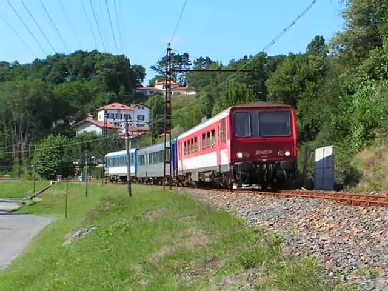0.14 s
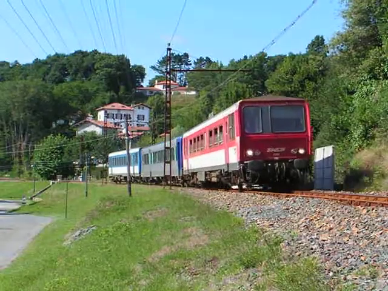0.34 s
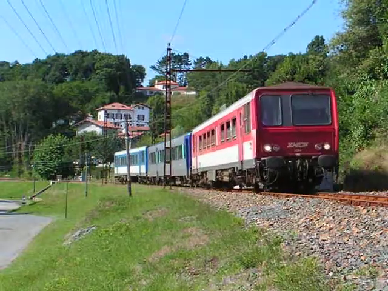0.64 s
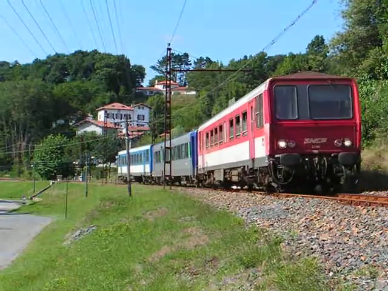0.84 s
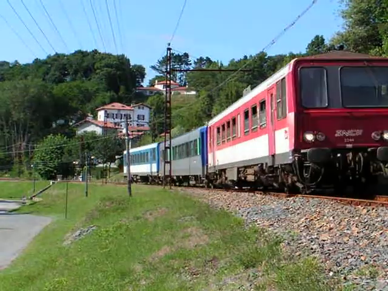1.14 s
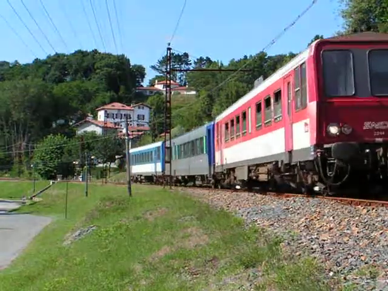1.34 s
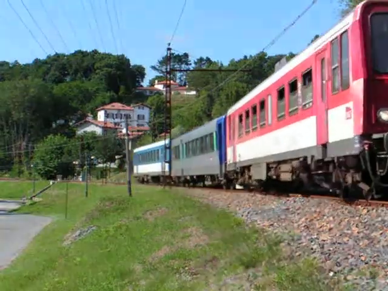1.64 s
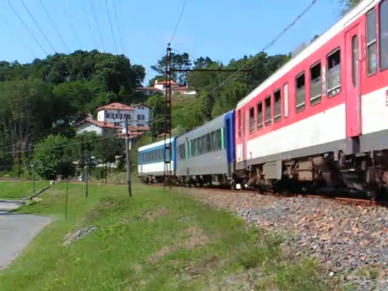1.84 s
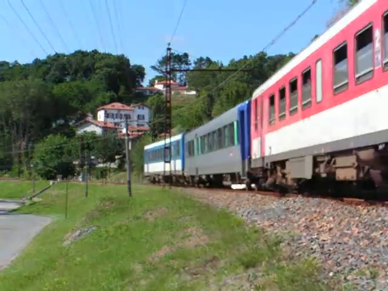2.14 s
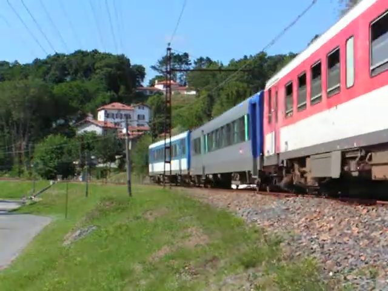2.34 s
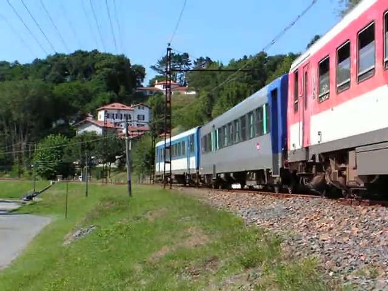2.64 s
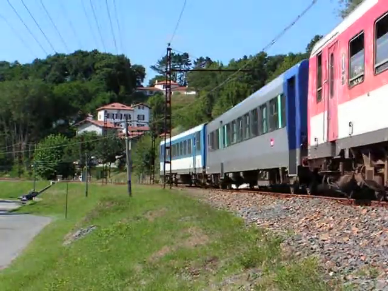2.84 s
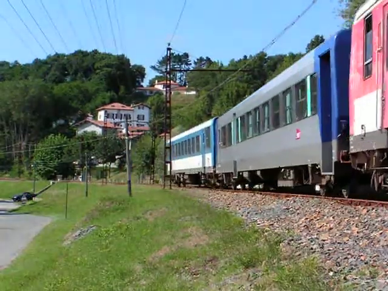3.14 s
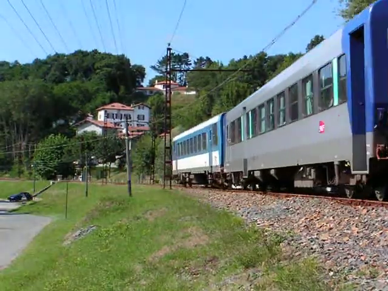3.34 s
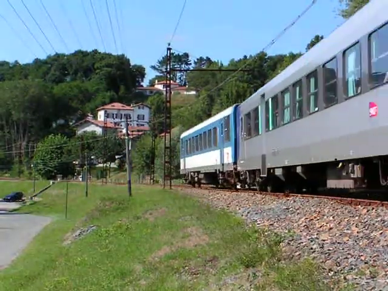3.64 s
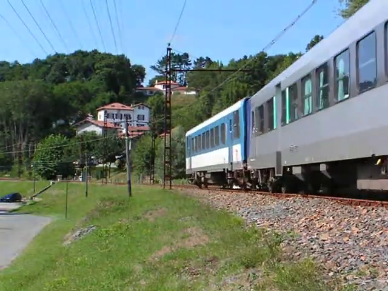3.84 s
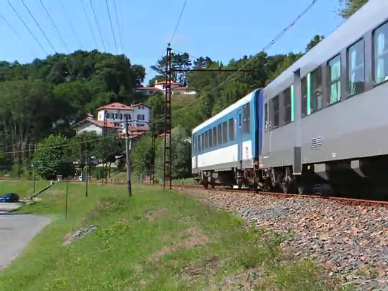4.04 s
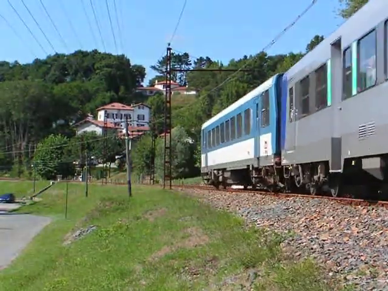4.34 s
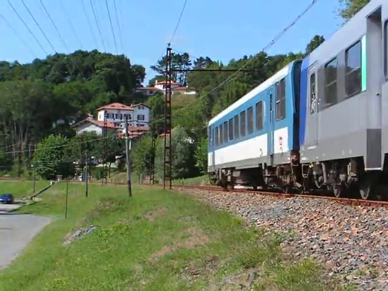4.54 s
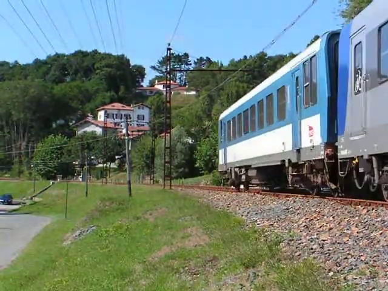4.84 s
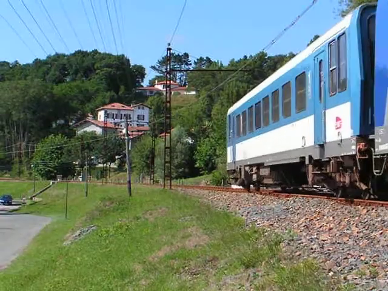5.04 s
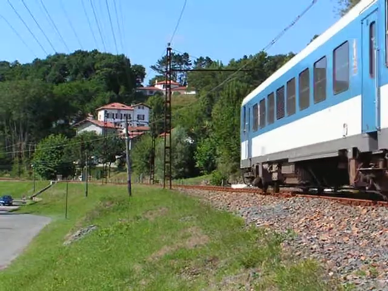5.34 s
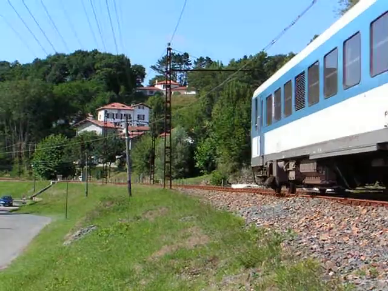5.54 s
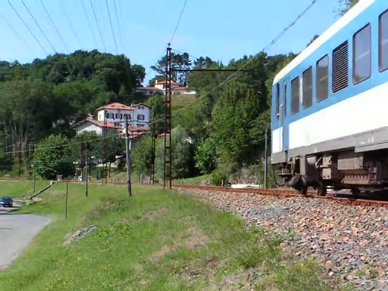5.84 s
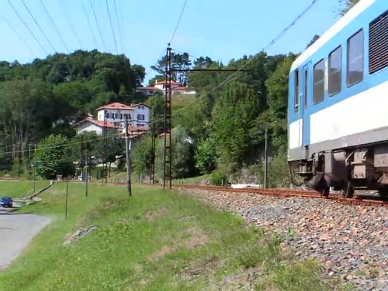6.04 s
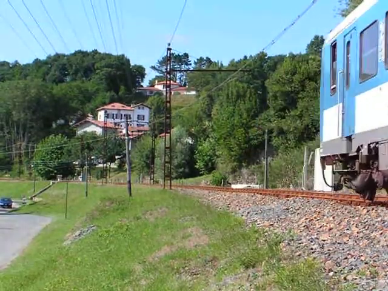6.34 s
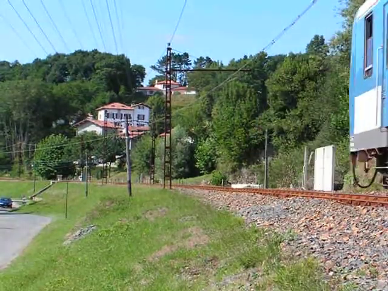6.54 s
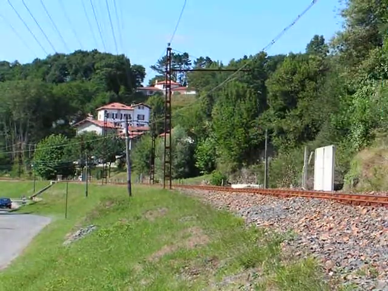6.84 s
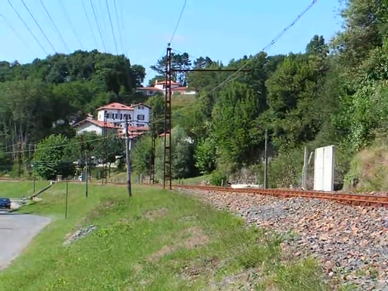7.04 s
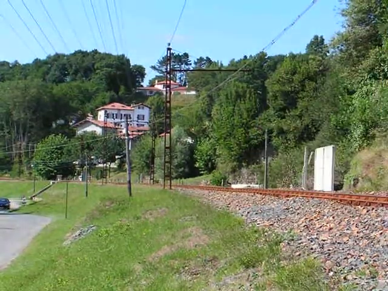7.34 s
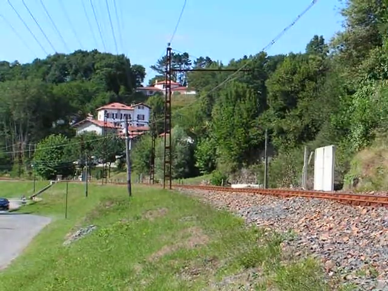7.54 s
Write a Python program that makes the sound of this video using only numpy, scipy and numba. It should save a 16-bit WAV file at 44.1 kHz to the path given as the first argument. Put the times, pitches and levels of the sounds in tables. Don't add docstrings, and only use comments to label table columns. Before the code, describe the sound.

A diesel railcar with coaches rolls past close by, engine throbbing low, wheels roaring and banging hard over rail joints with metallic ringing.

```python
import sys
import numpy as np
from scipy import signal
from scipy.fft import rfft, irfft
from scipy.io import wavfile
from scipy.ndimage import uniform_filter1d
from numba import njit

SR = 44100
rng = np.random.default_rng(int(sys.argv[2]) if len(sys.argv) > 2 else 0)


def amplitude_ratio(level_db):
    exponent = np.asarray(level_db, float) / 20
    return 10 ** exponent


def inscribe(sig):
    pcm = np.round(np.clip(np.atleast_2d(sig).T, -1, 1) * 32767)
    wavfile.write(sys.argv[1], SR, pcm.astype(np.int16))


N = 338688
T_S = np.arange(N) / SR

# centre in [Hz], width in [Hz], level in [dB].
WAKE_BANDS = [(50, 30, -4.5), (85, 44, 2.5)]
WAKE_CENTRE_S, WAKE_SPAN_S, WAKE_DB = 7.15, 0.2, -33

# centre in [Hz], width in [Hz], level in [dB].
SINGING_BANDS = [(1630, 28, 0.5)]
SINGING_CENTRE_S, SINGING_SPAN_S, SINGING_DB = 7.14, 0.36, -28.5

# centre in [Hz], width in [Hz], level in [dB].
EXHAUST_BANDS = [(124.7, 35, -4), (158.7, 32.4, 2), (192.2, 34, -3.5), (243, 69, -11), (85, 17, -7.5),
                 (50, 23, -8.5)]
FIRING_HZ, FIRING_SCATTER, FIRING_SIZE_DB, PUFF_DECAY_S = 27.5, 0.12, 4, 0.0074
ENGINE_GONE_S, ENGINE_FADE_S, ENGINE_LEFT = 2.85, 0.3, 0.59

# centre in [Hz], width in [Hz], level in [dB].
RUMBLE_BANDS = [(149, 88, -8), (214.7, 60, 3), (270.7, 60, 1)]

# time in [s], rolling level in [dB], engine and underframe level in [dB],
# floor resonance over rolling in [dB], rail corrugation over rolling in [dB].
TRAIN_LEVELS = [(0, -24, -27, -11.5, -9), (.2, -22.5, -27.5, -7.5, -8), (.53, -25.5, -27, -5.5, -5),
                (.88, -23.5, -27, -5, -6), (1.27, -20, -25.5, -9, -9.5), (1.7, -25, -27.5, -7, -8),
                (1.9, -22.5, -23.5, -8, -9), (2.251, -26, -25, -3, -7), (2.65, -25.5, -25, -4, -7.5),
                (2.84, -25.5, -25, 2, -4), (3.75, -29.5, -28, 0.5, 2.5), (4.45, -22.5, -30.5, 1.5, -3.5),
                (4.901, -23, -26, 3.5, -1), (5.13, -26, -23.5, 10.5, 1.5), (5.7, -25.5, -29.5, 1.5, -1.5),
                (6.27, -27.5, -37, 3.5, -1), (7.0, -27, -25.5, 7, 6.5), (7.37, -22, -27.5, 2.5, -1)]

# centre in [Hz], width in [Hz], level in [dB].
BODY_BANDS = [(310, 170, -2.5), (459, 158, 0.5), (668, 140, -6.5), (812, 230, 1.5)]

# time in [s], pitch in [Hz].
BOOM_PITCH = [(0, 474), (3.4, 495), (4.5, 645), (6.3, 575), (7.2, 506), (7.68, 563)]
BOOM_WIDTH_HZ, BOOM_DB, BOOM_WANDER = 147, -3, 0.066

# centre in [Hz], width in [Hz], level in [dB].
RAIL_BANDS = [(1000, 420, 1.5), (1260, 350, 0.5), (1756, 520, 4.5)]

# centre in [Hz], width in [Hz], level in [dB].
WHEEL_BANDS = [(2080, 400, -3), (2436, 340, -6), (2800, 456, 0.5), (3250, 520, -2.5), (3680, 580, -3)]

# time in [s], peak in [dB], pitch in [Hz].
RATTLE_KNOCKS = [(6.9248, -19, 1350), (6.9713, -14.5, 1322), (6.9935, -9.5, 1300), (7.0187, -13, 1205),
                 (7.0418, -15, 1500), (7.0673, -8.5, 1353), (7.093, -23, 1000), (7.1136, -20, 1610),
                 (7.1407, -13.5, 1196), (7.1856, -14, 1195)]
RATTLE_T60_S, RATTLE_DB = 0.014, -5.5

# time in [s], peak in [dB], pitch in [Hz].
HARD_KNOCKS = [(1.233, -.5, 2850), (1.2435, -4, 2710), (1.2865, -4.3, 2720), (2.766, -4, 2400),
               (2.7745, -3.5, 2300), (2.7885, -2, 2500), (2.7995, -2.5, 2900), (2.8435, -3, 2610),
               (2.854, -4, 2900), (3.976, -4, 2930), (4.4287, -1.5, 2205), (4.476, -3.5, 1980),
               (4.652, -2.8, 2000), (5.7627, -3.5, 2800), (5.9327, -.5, 2800), (6.432, -5.2, 2900),
               (7.0685, -1.2, 1097), (7.3668, -4, 2560), (7.372, -4, 2900), (7.547, -3.5, 2500)]
HARD_KNOCK_T60_S, HARD_KNOCK_PANEL_DB = 0.0041, -9.5
PANEL_HZ = 540

# pitch in [Hz], level in [dB], share of ring time [ratio].
DRIVING_WHEEL_MODES = [
    [(1988, -4.5, .8), (3375, 0.5, 1.15)],
    [(2190, -8, 1.2), (2700, 0.5, 1.1), (2870, -7, 1.2)],
]
COACH_WHEEL_MODES = [
    [(2950, -6, 1.1), (3030, 0.5, .9), (3520, -10, .9)],
    [(1830, -1.5, .7), (2380, 0.5, 1.1), (2660, -3, 1.1)],
]
TAIL_WHEEL_MODES = [
    [(2940, -5, .8), (3360, 0.5, 1.1)],
    [(2195, 0.5, 4.2)],
]

# time in [s], radial level in [dB], sideways level in [dB],
# ring time T60 in [s], detune in [percent].
DRIVING_WHEEL_BLOWS = [(.117, -40, -32, .8, 3.1), (1.23, -34, -25, .4, 1.8), (1.276, -16, -38, .7, .8),
                       (1.45, -36, -25, .5, 3.3), (2.839, -28, -22, .8, .1), (3.014, -25, -27, 1.7, -.3),
                       (3.974, -40, -31, .9, 1.5), (4.149, -32, -26, .7, -.1), (6.251, -40, -24, 1.2, .9),
                       (6.423, -42, -29, 1.2, -.1)]
COACH_WHEEL_BLOWS = [(4.47, -24, -31, .9, .2), (4.644, -23, -25, 2.6, .4), (5.754, -25, -27, 1.1, .3),
                     (5.929, -21, -21, 1.3, -.3)]
TAIL_WHEEL_BLOWS = [(7.308, -23, -45, .35, .6), (7.367, -21, -45, .85, .3), (7.541, -29, -17, .8, .1)]
RING_DROOP_PER_S, RING_FEED, RING_SPLIT_HZ, RING_TWIN = 0.035, 0.007, 20, 0.42
RING_FLICKER_DB, RING_WANDER, RING_DB = 3, 0.0035, -3.5

# centre in [Hz], width in [Hz], level in [dB].
CLATTER_BANDS = [(2120, 860, -1.5), (2750, 1300, 1), (3350, 610, 2.5), (3855, 1100, -5.5)]
# centre in [Hz], width in [Hz], level in [dB].
CRACK_BANDS = [(1104, 420, 0.5), (1590, 380, -1)]
# centre in [Hz], width in [Hz], level in [dB].
THUD_BANDS = [(300, 130, 1.5), (570, 350, 4.5)]

# time in [s], peak in [dB], thud over peak in [dB],
# crack over peak in [dB], clang pitch in [Hz].
FAR_AXLES = [(0.5783, -14, -16, 1.5, 3080), (0.826, -9, -6, -4, 2750), (0.8729, -8, -9, -19, 2820),
             (1.4062, -11, -12.5, -12, 3550), (1.6228, -14, -14.5, -31, 3340), (2.369, -3, -16, -26, 3240),
             (2.5387, -5.5, -13.5, -29, 3150), (2.701, -14, 7, -12, 2750), (2.7427, -16, 5.5, -1, 2170),
             (2.7913, -8, -14.5, 0.5, 3150), (2.8096, -10, -10, -6, 2046), (3.7477, -14.5, -1, 3.5, 3250),
             (3.9135, -9.5, -8.5, -3.5, 2120), (4.415, -6.5, -13.5, -1, 2920), (4.596, -12.5, 0, 1.5, 3090),
             (4.8477, -9, -6, -10.5, 2870), (5.0288, -6, -12, -10, 2640), (5.6989, -2, -30, -7.5, 3050),
             (5.8907, -13, -8.5, 3, 2410), (5.9694, -11.5, -6, -12, 3010),
             (6.0747, -12.5, -1.5, -19.5, 2350), (6.1916, -9, -10, -15, 3450), (7.3053, -7.5, -11, 0, 2110)]
# time in [s], peak in [dB], thud over peak in [dB],
# crack over peak in [dB], clang pitch in [Hz].
NEAR_AXLES = [(0.1168, -6.5, -22, -20, 2550), (1.048, -5.5, -14.5, -7.5, 2020),
              (1.2296, -5, -35.5, -33, 3310), (1.2755, -6.5, -16, -19, 2990), (1.4496, -2.5, -19, -7, 2800),
              (2.771, -7, -9, 1, 2395), (2.837, -0.5, -10, -2.5, 3120), (3.0135, -2.5, -7.5, -1.5, 2360),
              (3.9734, -1.5, -10, -6, 2746), (4.146, -3.5, -9, 1, 3160), (4.4687, -1, -6.5, -4.5, 2810),
              (4.644, -2.5, -12.5, -4.5, 3326), (5.7528, -0.5, -19.5, -5.5, 1975),
              (5.9265, 0.5, -17.5, -5, 3235), (6.2512, -1.5, -12, -5.5, 2020),
              (6.4225, -2.5, -10, -7, 2960), (7.3667, -2, -10.5, -5, 3040), (7.5398, -3, -10, -1, 2400)]
FAR_RISE_S, FAR_T60_S = 0.0042, 0.15
NEAR_RISE_S, NEAR_T60_S = 0.00075, 0.09
CRACK_SHARE, CLANG_WIDTH_HZ, CLANG_DB = 0.79, 340, -1.5

# time in [s], depth in [dB], hold in [s].
GAIN_DIPS = [(1.295, 13.5, 0.046), (1.439, 9, 0.044), (2.369, 7, 0.053), (2.56, 2.5, 0.055),
             (2.846, 15.5, .09), (3.04, 8, 0.23), (3.304, 11, 0.055), (4.008, 6.5, 0.074),
             (4.167, 7, 0.054), (4.463, 8, 0.056), (4.661, 9.5, 0.049), (5.758, 4.5, .09),
             (5.964, 1.5, 0.16), (6.297, 6, 0.27), (6.45, 10.5, 0.28), (6.555, 13.5, 0.07),
             (7.38, 17.5, 0.07), (7.57, 16.5, .12)]
DIP_FALL_S, RECOVER_DB_PER_S = 0.022, 35
ENGINE_DIP, RAIL_DIP, WHEEL_DIP, RING_DIP = 1.07, 0.92, 0.56, 0.3

# frequency in [Hz], gain in [dB].
CAMERA_RESPONSE = [(20, -14), (90, 0.5), (150, 1), (3400, 0.5), (3900, -7.5), (4300, -17), (4600, -42),
                   (4800, -88)]
PREAMP_CEILING, MIC_OFFSET, CLIP_LEVEL = 0.75, 0.0254, 0.707


def level(x, db):
    return x * amplitude_ratio(db) / np.sqrt(np.mean(x ** 2))


@njit
def ring(x, pole):
    y, z = np.empty(len(x)), 0j
    for i in range(len(x)):
        z = z * pole[i] + x[i]
        y[i] = z.imag
    return y


def band(x, hz, width_hz):
    return signal.lfilter(*signal.iirpeak(hz, hz / width_hz, SR), x)


def steep_band(x, hz, width_hz):
    return band(band(x, hz, width_hz), hz, width_hz)


def walk(rate_hz):
    k = int(SR / rate_hz)
    steps = np.repeat(rng.standard_normal(N // k + 1), k)
    return 1.28 * uniform_filter1d(uniform_filter1d(steps, k), k)[:N]


def swell(centre_s, span_s):
    return np.exp(-((T_S - centre_s) / span_s) ** 2)


def roar(modes, shared_db, flicker_db, rate_hz):
    out = 0
    for hz, width_hz, db in modes:
        noise = steep_band(rng.standard_normal(N), hz, 1.64 * width_hz)
        out = out + level(noise, db) * amplitude_ratio(shared_db + flicker_db * walk(rate_hz))
    return level(out, 0)


def wake():
    return swell(WAKE_CENTRE_S, WAKE_SPAN_S) * roar(WAKE_BANDS, 0, 2.9, 14)


def singing_rail():
    return swell(SINGING_CENTRE_S, SINGING_SPAN_S) * roar(SINGING_BANDS, 0, 2.5, 20)


def underframe_rumble(jolts):
    return roar(RUMBLE_BANDS, 0.28 * jolts, 1.4, 15)


def engine():
    chance = rng.standard_normal((N // 500, 2))
    gaps = SR / FIRING_HZ * (1 + FIRING_SCATTER * chance[:, 0])
    starts = np.cumsum(gaps).astype(int)
    inside = starts < N
    pulses = np.zeros(N)
    pulses[starts[inside]] = amplitude_ratio(FIRING_SIZE_DB * np.clip(chance[inside, 1], -2, 1))
    puffs = signal.lfilter([1], [1, -np.exp(-1 / (PUFF_DECAY_S * SR))], pulses)
    gas = (puffs + 0.5) * rng.standard_normal(N)
    out = sum(level(steep_band(gas, hz, 2.0 * width_hz), db) for hz, width_hz, db in EXHAUST_BANDS)
    return level(out, 0)


def low_end_shares():
    near = 1 / (1 + np.exp((T_S - ENGINE_GONE_S) / ENGINE_FADE_S))
    engine_share = ENGINE_LEFT + (1 - ENGINE_LEFT) * near
    return engine_share, np.sqrt(np.clip(1 - engine_share ** 2, 0, 1))


def body(boom_hz, jolts_db):
    pole = np.exp(2j * np.pi * boom_hz / SR - np.pi * BOOM_WIDTH_HZ / SR)
    boom = ring(ring(rng.standard_normal(N), pole), pole)
    panels = roar(BODY_BANDS, jolts_db, 2.2, 25)
    return level(panels + level(boom, BOOM_DB) * amplitude_ratio(jolts_db + 1.6 * walk(45)), 0)


def rail_roar(jolts):
    return roar(RAIL_BANDS, 0.59 * jolts, 1.9, 30)


def wheel_hiss(jolts):
    return roar(WHEEL_BANDS, 1.1 * jolts, 2.4, 30)


def knocks(table, t60_s, panel_db):
    out = np.zeros(N)
    t = T_S[:SR // 10]
    shape = t * np.exp(-t * np.log(1000) / t60_s)
    shape = shape / shape.max()
    panel = amplitude_ratio(panel_db) * np.sin(2 * np.pi * PANEL_HZ * t)
    for s, db, hz in table:
        out[int(s * SR):][:len(t)] += amplitude_ratio(db) * (np.sin(2 * np.pi * hz * t) + panel) * shape
    return out


def struck_modes():
    sets = ((DRIVING_WHEEL_MODES, DRIVING_WHEEL_BLOWS), (COACH_WHEEL_MODES, COACH_WHEEL_BLOWS),
            (TAIL_WHEEL_MODES, TAIL_WHEEL_BLOWS))
    rings = []
    for wheel, blows in sets:
        for s, radial_db, sideways_db, t60_s, detune in blows:
            for modes, db in zip(wheel, (radial_db, sideways_db)):
                for hz, mode_db, share in modes:
                    rings.append((s, hz * (1 + detune / 100), db + mode_db, t60_s * share))
    return rings


def ringing_wheels():
    out = np.zeros(N)
    flicker = amplitude_ratio(RING_FLICKER_DB * walk(35))
    wander = RING_WANDER * walk(12)
    rings = struck_modes()
    starts = rng.integers(0, N - SR, len(rings))
    noises = rng.standard_normal((len(rings), SR))
    for (s, hz, db, t60_s), noise, start in zip(rings, noises, starts):
        i = int(s * SR)
        t = T_S[:min(SR, N - i)]
        part = slice(start, start + len(t))
        push = RING_FEED * noise[:len(t)] * 1000. ** (-t / t60_s)
        push[0] = 1
        fade = np.cos(np.pi * t / 2) * flicker[part]
        for split_hz, share in ((0, 1), (RING_SPLIT_HZ, RING_TWIN)):
            falling_hz = (hz + split_hz) * (1 - RING_DROOP_PER_S * t + wander[part])
            tone = ring(push, np.exp(2j * np.pi * falling_hz / SR - np.log(1000) / (t60_s * SR)))
            out[i:i + len(t)] += amplitude_ratio(db + RING_DB) * share * tone * fade
    return out


def joints(table, rise_s, t60_s):
    clatter = roar(CLATTER_BANDS, 0, 3.0, 120)
    crack = roar(CRACK_BANDS, 0, 1.4, 130)
    thud = roar(THUD_BANDS, 0, 2.3, 60)
    white = rng.standard_normal(N)
    out = np.zeros(N)
    for s, db, thud_db, crack_db, clang_hz in table:
        i = int(s * SR)
        t = T_S[:min(SR // 4, N - i)]
        here = slice(i, i + len(t))
        attack = 1 - np.exp(-t / rise_s)
        shape = attack * 1000. ** (-(t / t60_s) ** 1.4)
        short = attack * 1000. ** (-(t / (CRACK_SHARE * t60_s)) ** 1.12)
        clang = level(band(white[here], clang_hz, CLANG_WIDTH_HZ), CLANG_DB)
        parts = ((shape * (clatter[here] + clang), 0), (short * crack[here], crack_db),
                 (shape * thud[here], thud_db))
        for burst, part_db in parts:
            out[here] += amplitude_ratio(db + part_db - 2) * burst / np.abs(burst).max()
    return out


def gain_dip():
    dip_db = np.zeros(N)
    for s, depth_db, hold_s in GAIN_DIPS:
        t = np.maximum(T_S - s, 0)
        left_db = depth_db - RECOVER_DB_PER_S * np.maximum(t - hold_s, 0)
        dip_db = np.maximum(dip_db, (1 - np.exp(-t / DIP_FALL_S)) * left_db)
    return -dip_db


def scene():
    s, *columns = np.transpose(TRAIN_LEVELS)
    roll_db, low_db, floor_db, corrugation_db = (np.interp(T_S, s, c) for c in columns)
    dip_db = gain_dip()
    low_db = low_db + ENGINE_DIP * dip_db
    body_db = roll_db + floor_db + dip_db
    rail_db = roll_db + corrugation_db + RAIL_DIP * dip_db
    wheel_db = roll_db + WHEEL_DIP * dip_db
    boom_hz = np.interp(T_S, *np.transpose(BOOM_PITCH)) * (1 + BOOM_WANDER * walk(8))
    jolts = walk(19)
    engine_share, coach_share = low_end_shares()

    out = amplitude_ratio(low_db) * engine_share * engine()
    out += amplitude_ratio(body_db) * body(boom_hz, 0.69 * jolts)
    out += amplitude_ratio(rail_db) * rail_roar(jolts)
    out += amplitude_ratio(wheel_db) * wheel_hiss(jolts)
    out += knocks(RATTLE_KNOCKS, RATTLE_T60_S, RATTLE_DB)
    out += knocks(HARD_KNOCKS, HARD_KNOCK_T60_S, HARD_KNOCK_PANEL_DB)
    out += joints(NEAR_AXLES, NEAR_RISE_S, NEAR_T60_S)
    out += joints(FAR_AXLES, FAR_RISE_S, FAR_T60_S)
    out += amplitude_ratio(RING_DIP * dip_db) * ringing_wheels()
    out += amplitude_ratio(low_db) * coach_share * underframe_rumble(jolts)
    out += amplitude_ratio(WAKE_DB + dip_db) * wake()
    out += amplitude_ratio(SINGING_DB + RING_DIP * dip_db) * singing_rail()
    return out[None]


def band_limit(x):
    return signal.sosfilt(signal.butter(12, 15850, fs=SR, output="sos"), x)


def record(dry):
    hz, db = np.transpose(CAMERA_RESPONSE)
    f_hz = np.maximum(np.fft.rfftfreq(N, 1 / SR), 1)
    response = amplitude_ratio(np.interp(np.log(f_hz), np.log(hz), db, right=-120))
    saturated = PREAMP_CEILING * np.tanh(dry / PREAMP_CEILING)
    narrow = irfft(rfft(saturated) * response, N)
    mix = np.clip(narrow + MIC_OFFSET, -CLIP_LEVEL, CLIP_LEVEL)
    return band_limit(mix)


dry = scene()
out = record(dry)
inscribe(out)
```